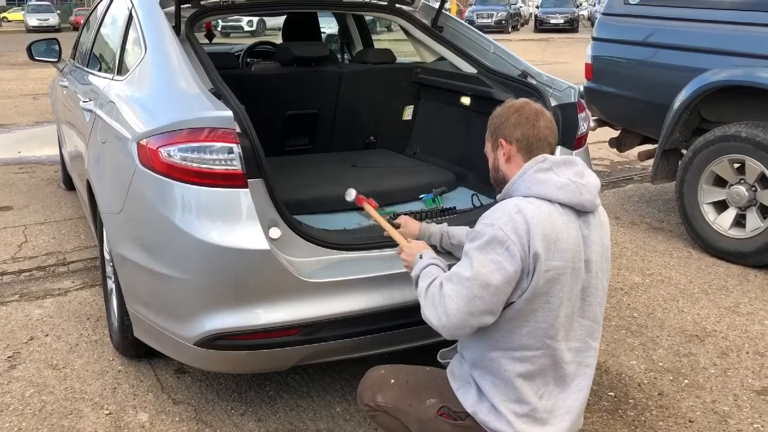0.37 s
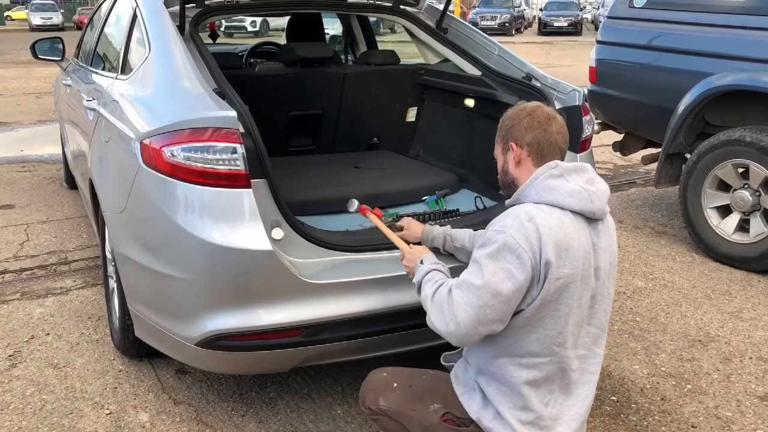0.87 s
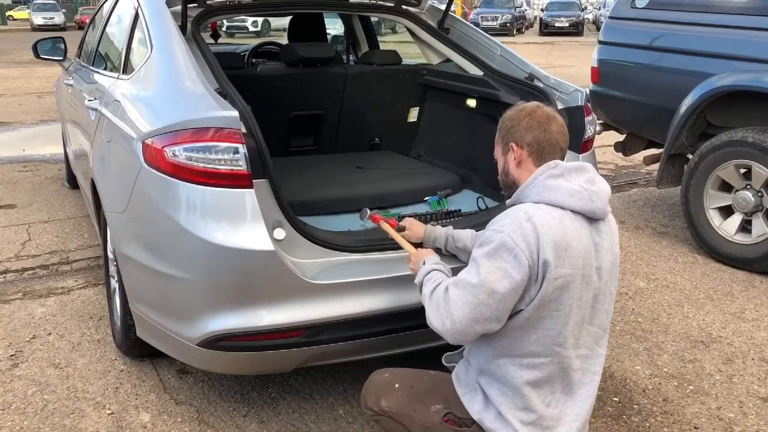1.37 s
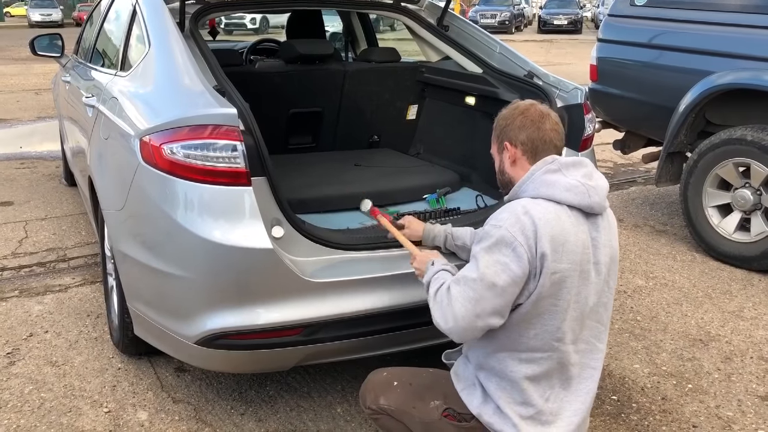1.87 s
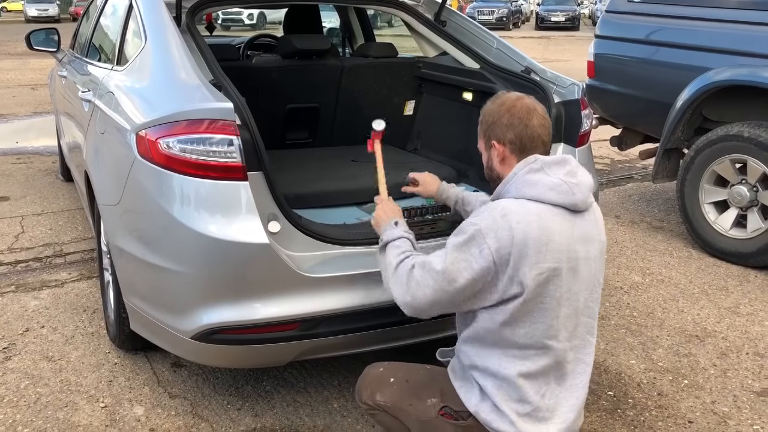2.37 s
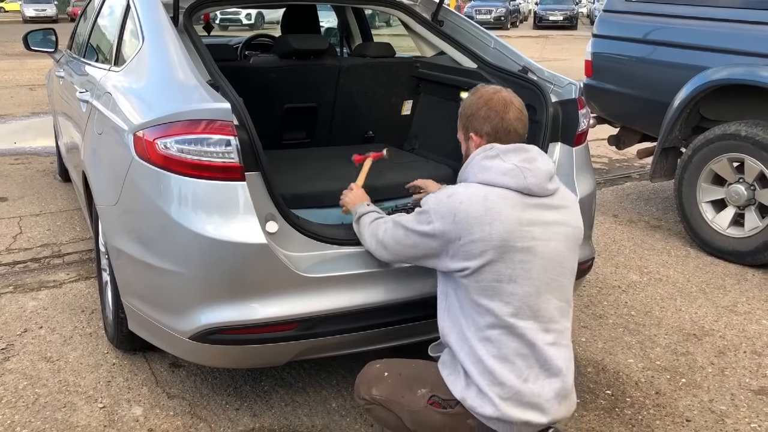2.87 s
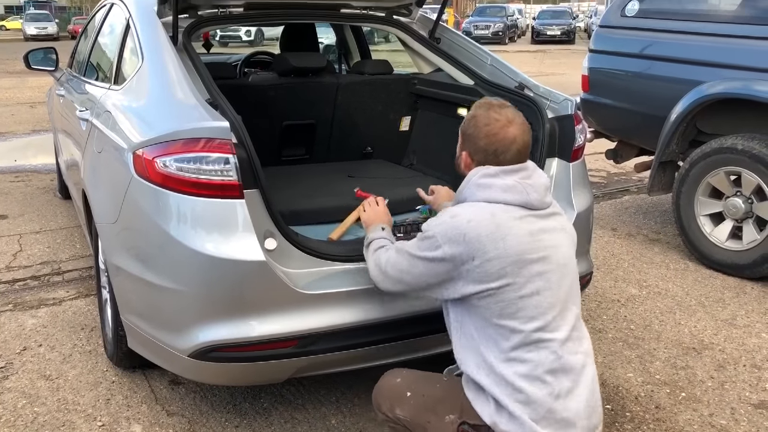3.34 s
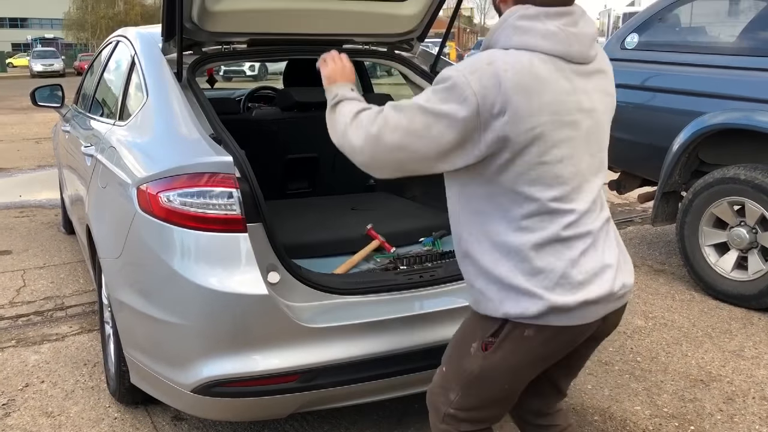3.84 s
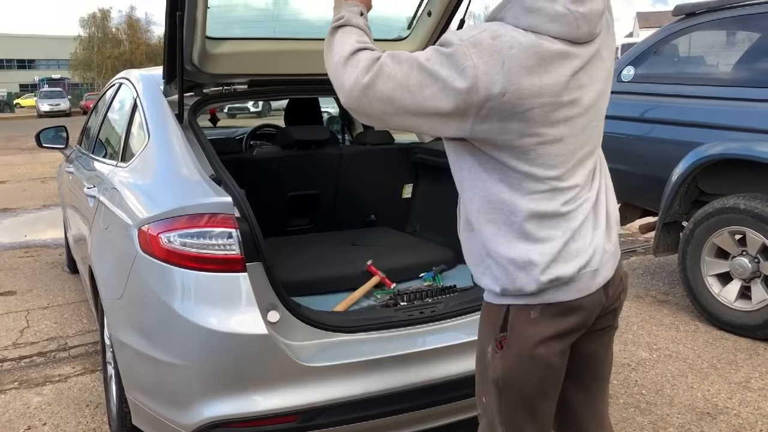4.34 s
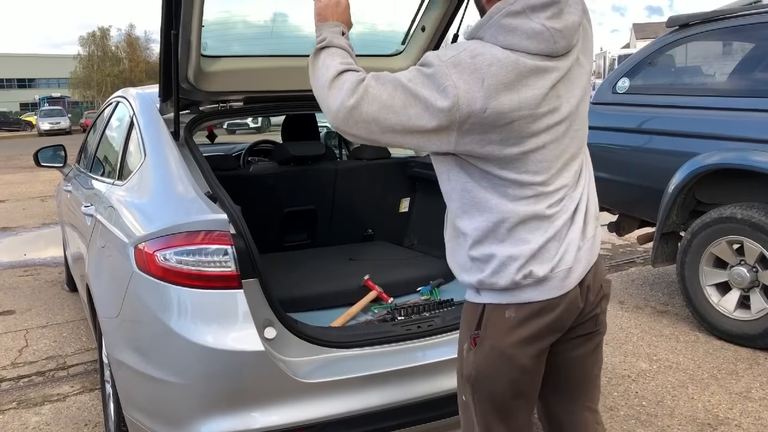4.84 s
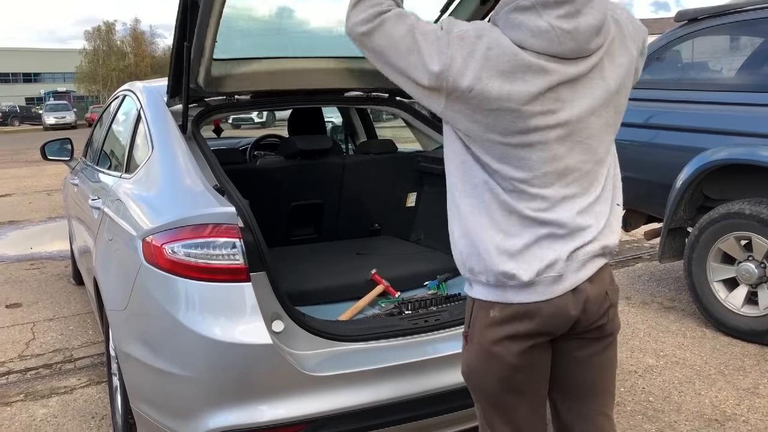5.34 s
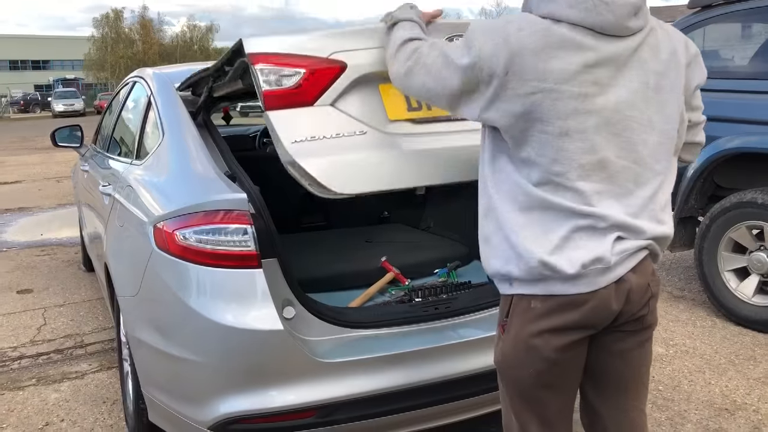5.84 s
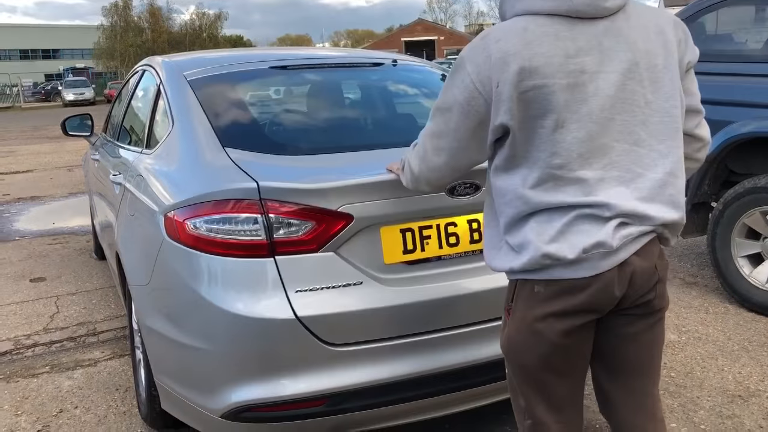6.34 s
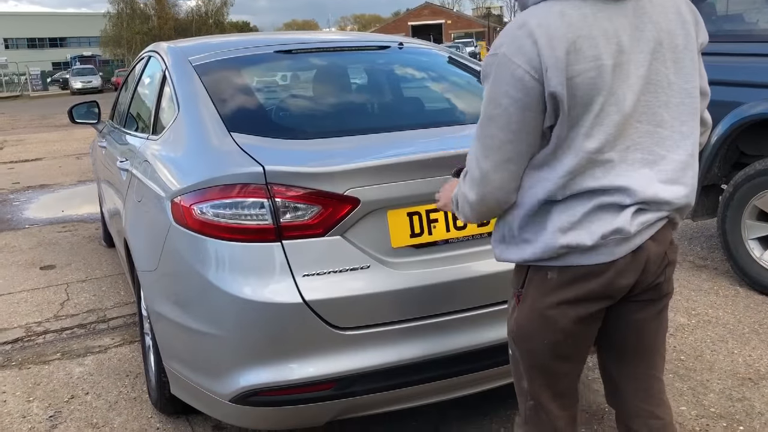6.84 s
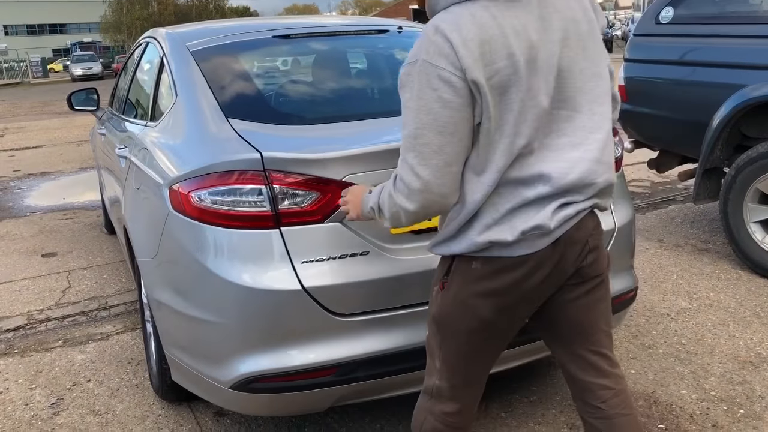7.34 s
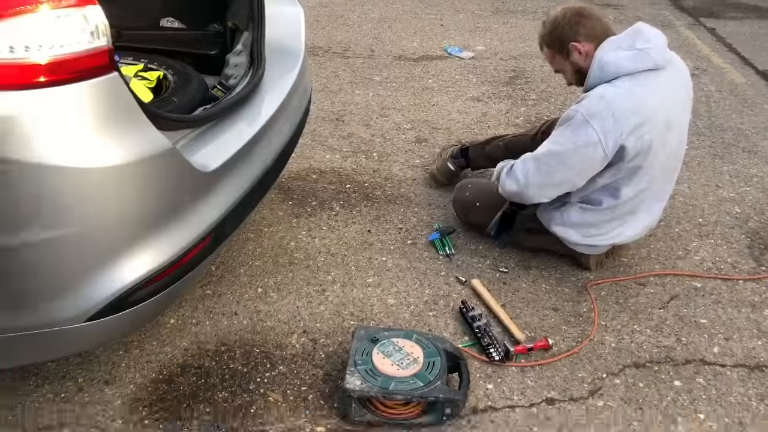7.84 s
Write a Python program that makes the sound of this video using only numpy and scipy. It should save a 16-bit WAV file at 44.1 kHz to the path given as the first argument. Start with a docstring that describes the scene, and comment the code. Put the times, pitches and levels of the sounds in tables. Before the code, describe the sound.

A hammer cracks hard on ringing car steel twice with light taps between, tools clatter down, then a boot lid slams over a distant idling diesel.

```python
"""A hammer hits steel in the open boot of a car: two hard blows, two light taps; tools are put down, then the lid slams.
Each blow is a noise crack, fading sines for the ringing steel and the late boom of the shell, and a panel tail of noise.
Tools are short rings and puffs of noise; the slam is noise knocks over a booming set of fading sines.
Faint hums and squeaks are wavering sines. A four-cylinder diesel idles some way off: pulses set off fading sines.
Under it all, shaped noise makes the steady sound of a yard."""
import sys
import numpy as np
from scipy import signal
from scipy.fft import rfft, irfft
from scipy.io import wavfile

SR = 44100
rng = np.random.default_rng(int(sys.argv[2]) if len(sys.argv) > 2 else 0)


def undo_db(level):
    """Turn decibels back into plain size, where 20 dB means ten times bigger."""
    steps = np.asarray(level, float) / 20
    return 10 ** steps


def dump(signal):
    """Clip the signal to [-1, 1] and save it as 16-bit WAV at the path in sys.argv[1]."""
    limited = np.clip(np.atleast_2d(signal).T, -1, 1)
    pcm = np.round(limited * 32767).astype(np.int16)
    wavfile.write(sys.argv[1], SR, pcm)


N = 350595
TIME = np.arange(N) / SR  # seconds


def on_log(table, hz):
    """Read a (Hz, value) table along log frequency."""
    table_hz, values = np.array(table).T
    return np.interp(np.log(hz + 1), np.log(table_hz), values)


def coloured(size, gain):
    """Noise of rms 1, its spectrum shaped by the amplitude gain(Hz)."""
    hz = np.arange(size // 2 + 1) * SR / size
    x = irfft(rfft(rng.standard_normal(size)) * gain(hz), size)
    return x / np.std(x)


def swell(t, rise, t60):
    """Level curve: builds up with time constant rise, while dying 60 dB every t60 (both in seconds)."""
    build_up = 1 - np.exp(-t / max(rise, 1 / SR))
    return build_up * undo_db(-60 * t / t60)


def add(out, s, x):
    """Mix x into out from time s (seconds)."""
    i = int(s * SR)
    out[i:i + len(x)] += x[:N - i]


def ring(modes, t, cycles, rough, beat_hz):
    """Fading sines that build over some cycles; crowded neighbours make each one beat unevenly."""
    out = 0
    for hz, db, t60 in modes:
        re, im = (coloured(len(t), lambda f: 1 / (1 + (f / beat_hz) ** 2)) for _ in range(2))
        beats = (1 + rough * (re + 1j * im)) / np.sqrt(1 + 2 * rough ** 2)
        turning = np.exp(2j * np.pi * (hz * t + rng.random()))  # random starting phase
        out = out + undo_db(db) * swell(t, cycles / hz, t60) * np.imag(beats * turning)
    return out


def walk(rate):
    """Slow random level, spread 1, moving mostly below rate (Hz)."""
    return coloured(N, lambda hz: 1 / (1 + (hz / rate) ** 2))


def burst(t, centre_hz, octaves, rise, t60):
    """A short puff of contact noise around centre_hz, with peak 1."""
    band = lambda hz: np.exp(-(np.log2((hz + 1) / centre_hz) / octaves) ** 2)
    x = swell(t, rise, t60) * coloured(len(t), band)
    return x / np.max(abs(x))


def tones(table, waver, flicker_db):
    """Faint sines with unsteady pitch and level that fade in and out."""
    out = np.zeros(N)
    for s0, s1, hz0, hz1, db in table:
        size = int((s1 - s0) * SR)
        drift, flicker = (coloured(size, lambda f: (f > 0) / (1 + (f / 12.0) ** 2)) for _ in range(2))
        hz = np.linspace(hz0, hz1, size) * (1 + waver * drift)
        sine = np.sqrt(2) * np.sin(2 * np.pi * np.cumsum(hz) / SR)  # rms 1
        fade = signal.windows.tukey(size, .4)
        add(out, s0, undo_db(db + flicker_db * flicker) * fade * sine)
    return out


def yard():
    """Distant traffic and works: octave bands of noise that swell together and flicker alone."""
    # Overall colour of the noise. Each row: frequency in Hz, relative level in dB per Hz.
    spectrum = [(15, -51), (25, -14), (64, -3), (114, -1), (130, -7.5), (242, -1.5), (326, -9.5), (373, -7),
                (405, -10.5), (516, -7), (575, -11.5), (1260, -16), (1840, -23), (10700, -43),
                (16000, -53.5)]
    # Broad bands standing out of it. Each row: centre in Hz, width in Hz, extra level in dB.
    raised_bands = [(2308, 81, 6.5), (4840, 250, 3.5), (5450, 270, 4.5), (10700, 540, 2), (13200, 550, 5)]
    level_db, leaving_db, leaving_s = -43.5, 2.5, 0.7

    def colour(hz):
        raised = sum(db * np.exp(-((hz - c) / w) ** 2) for c, w, db in raised_bands)
        return undo_db(on_log(spectrum, hz) + raised)

    out, common = 0, walk(0.43)
    noise = rfft(coloured(N, colour))
    octave = np.log2(np.arange(len(noise)) * SR / N + 1)
    for c in np.arange(4, 15):
        band = irfft(noise * np.clip(1 - abs(octave - c), 0, 1), N)  # overlaps its neighbours
        out = out + undo_db(1.35 * common + 1.1 * walk(3.9)) * band
    # louder at first, settling as distant traffic draws away
    return undo_db(level_db + leaving_db * np.exp(-TIME / leaving_s)) * out


def diesel():
    """Steady idle: four firings a cycle, the knock of the harder ones showing most in the upper resonances."""
    # What each firing sets ringing. Each row: frequency in Hz, t60 in seconds, level in dB,
    # dB lost for each unit of softness (a minus sign means gained).
    resonances = [(77.7, .081, -47, 1), (192.4, 0.15, -49.5, -0.5), (299.3, .22, -48, .3),
                  (538.4, 0.19, -52, -0.5), (1228.6, .13, -45.5, 10), (2370, .025, -55, 6.5),
                  (5000, .0254, -55, 2)]
    # Softness of each cylinder's firing, a plain number per cylinder: two knock, two are soft.
    softness = (0.02, 0.11, 1.03, 0.52)
    cycle_hz, first_firing_s = 6.2, 0.00498
    count = int(N / SR * 28)  # more than enough firings to fill the scene
    chance = rng.standard_normal((count, 2))
    firing_s = first_firing_s + np.arange(count) / (4 * cycle_hz) + .0004 * chance[:, 0]
    at = (firing_s * SR).astype(int)
    inside = at < N
    out = 0
    for hz, t60, db, soft_db in resonances:
        strength = undo_db(db - soft_db * np.resize(softness, count) + 2.64 * chance[:, 1])
        pulses = np.zeros(N)
        pulses[at[inside]] = strength[inside]
        t = TIME[:int(t60 * SR)]
        knock = swell(t, 0.0025, t60) * np.sin(2 * np.pi * hz * t)
        out = out + signal.fftconvolve(pulses, knock)[:N]
    return out


def panel_tail(t, colour, light):
    """Bending waves spread through the sheet: noise by half octaves; the lower the band, the later it peaks."""
    # How long the sheet sounds after a hard blow. Each row: frequency in Hz, t60 in seconds.
    hard_t60 = [(100, 0.39), (400, 0.25), (1500, 0.14), (5000, 0.21), (14000, .15)]
    shallow_hz_per_db = 5.5  # a lighter blow does not reach the lowest bands
    out = 0
    for c in 90 * 2 ** (np.arange(16) / 2):
        level = colour(c) * np.sqrt(c / 200) / (1 + (shallow_hz_per_db * light / c) ** 2)
        t60 = 1 / (1 / on_log(hard_t60, c) - .1 * light)  # shorter for a lighter blow
        band = coloured(len(t), lambda hz: np.exp(-(np.log2((hz + 1) / c) / 0.55) ** 2))
        out = out + level * swell(t, 4.0 / c + 0.0065, t60) * band
    return out


def hammer():
    """Steel strikes steel: a sharp crack, rings, a panel tail and a boom that arrives late."""
    # Hammer blows. Each row: start in seconds, blow level in dB, head ring in dB relative to the blow,
    # head ping in dB relative to the blow.
    blows = [(.373, -9.5, -9.5, -19), (1.289, -30, -24, -9), (1.4672, -38, -19.5, -8),
             (1.9508, -9.5, -5.5, -3)]
    # Colour of crack and panel tail for a hard blow. Each row: frequency in Hz, level in dB per Hz.
    panel_colour = [(47, -28), (80, -7.5), (283, -0.5), (404, -17.5), (802, -6), (1900, -18.5), (4420, -18),
                    (6030, -36), (7870, -25.5), (10300, -38), (11700, -33.5), (12500, -52), (16000, -52)]
    # Rings of latch plate, hammer head, the head's thinnest ping, and the car's shell.
    # Each row: frequency in Hz, relative level in dB, t60 in seconds (for all but the head: of a hard blow).
    plate_modes = [(508, -7, .35), (570, -4, .25), (808, -8, .18), (1060, -12, .2), (1325, -6, .22),
                   (1640, -13, .2), (1880, -7, .22), (2070, -10, .2), (2280, -7, .17), (2510, -12, .13),
                   (3180, -13, .2), (3390, -6, .08), (3350, -15, .55), (3560, -20, .45), (3728, -3, .15),
                   (3975, -3, .18), (4090, -18, .3), (4200, -8, .12), (4312, -7, .22), (4506, -7, .18),
                   (4540, -16, .4), (4732, -11, .14), (5260, -18, .18)]
    head_modes = [(6430, -11, .1), (7730, 7, .05), (7757, -15, .4), (7908, -18, .22), (8425, -16, .3),
                  (8560, -10, .12), (8640, -19, .42), (8800, -10, .16), (9135, -16, .12), (15400, -26, .18)]
    ping_modes = [(3430, -23, .5), (3488, -21, .6), (3550, -23, .5), (11590, 0, .12), (11770, -18, .2)]
    shell_modes = [(58.7, -12, 1), (118.2, -9, 0.74), (129.7, 4.5, 0.28), (176.3, -0.5, 0.43),
                   (241.8, -4.5, 0.52), (269.2, -0.5, 0.35), (335, -0.5, 0.24), (391, -20, 0.33)]
    hard_db = -9
    # a lighter blow is duller (dB per octave), and the resting head damps the steel (1 / s)
    dull_per_db, damp_per_db = .12, .22
    # a lighter blow leaves more to the plate and the panel; the boom grows slightly too
    plate_db, plate_per_db = -9, 0.46
    panel_db, panel_per_db = -7, 0.2717
    boom_db, boom_per_db = -0.5, -0.1
    rebound_s, rebound_db, rebound_ring_db = .0065, -8, -18

    out, t = np.zeros(N), TIME[:SR // 2]
    # a loosely held tap lands twice, the head hardly ringing the second time
    rebounds = [(s + rebound_s, db + rebound_db, head + rebound_ring_db, ping + rebound_ring_db)
                for s, db, head, ping in blows if db < 2 * hard_db]
    for s, db, head_db, ping_db in blows + rebounds:
        light = min(db - hard_db, 0)  # 0 or below: dB short of a hard blow

        def colour(hz):
            return undo_db(on_log(panel_colour, hz) + dull_per_db * light * np.log2((hz + 100) / 2000))

        def damped(modes):
            return [(hz, d, 1 / (1 / t60 - damp_per_db * light)) for hz, d, t60 in modes]

        crack_noise = coloured(len(t), lambda hz: colour(hz) * (hz / (hz + 1500.0)) ** 3)
        crack = undo_db(7.5) * swell(t, 0.00024, 0.012) * crack_noise
        plate = ring(damped(plate_modes), t, cycles=0.58, rough=0.85, beat_hz=60.)
        head = ring(head_modes, t, cycles=1.4, rough=0.75, beat_hz=70.)
        ping = ring(damped(ping_modes), t, cycles=18.0, rough=0.4, beat_hz=40.3)
        steel = undo_db(plate_db - plate_per_db * light) * plate + undo_db(head_db) * head + undo_db(ping_db) * ping
        # the shell takes a few hundredths of a second to pick up the blow
        shell = swell(t, .009, .7) * ring(damped(shell_modes), t, cycles=1.6, rough=.3, beat_hz=12.)
        boom = undo_db(boom_db + boom_per_db * light) * shell
        panel = undo_db(panel_db - panel_per_db * light) * panel_tail(t, colour, light)
        add(out, s, undo_db(db) * (crack + steel + boom + panel))
    return out


def echo(near):
    """The open boot and the cars beside it send back a dull, diffuse tail, made of fading noise."""
    level_db, rise_s, t60_s, top_hz = -23, 0.0039, 0.48, 5000.
    dull = lambda hz: hz / (hz + 33.0) / (1 + (hz / top_hz) ** 2)
    tail = swell(TIME[:SR], rise_s, t60_s) * coloured(SR, dull)
    tail = tail / np.sqrt(np.sum(tail ** 2))
    return undo_db(level_db) * signal.fftconvolve(near, tail)[:N]


def handling():
    """Tools touch and are put down: clinks of small steel and short bursts of contact noise."""
    # Tools touching. Each row: start in seconds, level in dB.
    clinks = [(2.862, -33), (3.655, -49.5)]
    # What each clink rings with, one list per clink. Each row: frequency in Hz, relative level in dB,
    # t60 in seconds.
    clink_modes = ([(3530, -7.5, 0.045), (3800, -14, .04), (8190, -8, 0.11), (8310, -6.5, .2),
                   (15600, -23.5, .14)], [(3460, -2, .15), (3740, -2, .15), (4600, -2, .2),
                   (6417, -4, 0.17), (7897, -7, 0.15), (10140, -8, 0.26), (11200, -5, 0.17)])
    # Hard ticks. Each row: start in seconds, peak in dB, centre in Hz.
    ticks = [(1.673, -41, 2980), (2.281, -38, 2490), (2.862, -38, 4800), (3.291, -47, 4500),
             (3.304, -41, 2800), (3.329, -36.5, 4470), (3.345, -40, 4000), (3.356, -33, 3140),
             (3.367, -40, 3000), (3.573, -48, 7000), (3.738, -44, 5000), (3.793, -48, 4000),
             (4.258, -45, 4500), (4.58, -36, 2300)]
    # Soft thumps. Each row: start in seconds, peak in dB, centre in Hz.
    thumps = [(3.131, -31, 199), (3.165, -22, 220), (3.641, -29, 280), (4.266, -30, 170),
              (5.915, -31.5, 204)]
    # Scuffs and rustles, cut after 1 s. Each row: start in seconds, peak in dB, centre in Hz, t60 in seconds.
    scuffs = [(2.79, -43, 11800, 0.061), (3.334, -48, 7000, 0.24), (4.93, -53.5, 8680, 3.2),
              (5.88, -55, 10000, .07), (5.903, -54, 9000, .1), (7.32, -53.5, 7000, .072)]
    out, t = np.zeros(N), TIME[:SR]
    for (s, db), modes in zip(clinks, clink_modes):
        add(out, s, undo_db(db) * ring(modes, t, cycles=0.97, rough=0.62, beat_hz=40.))
    for s, db, hz in ticks:
        add(out, s, undo_db(db) * burst(t, hz, octaves=.85, rise=0.000504, t60=.026))
    for s, db, hz in thumps:
        add(out, s, undo_db(db) * burst(t, hz, octaves=0.79, rise=0.0034, t60=0.061))
    for s, db, hz, t60 in scuffs:
        add(out, s, undo_db(db) * burst(t, hz, octaves=0.96, rise=0.1 * t60, t60=t60))
    return out


def hums():
    """A low hum that comes and goes: single sines gliding in pitch."""
    # Each row: start in seconds, end in seconds, start pitch in Hz, end pitch in Hz, middle level in dB.
    hum_table = [(2.12, 2.68, 232.7, 237.4, -46), (4.33, 4.63, 240, 210.7, -45.5),
                 (5.03, 5.27, 218.6, 227, -49), (5.4, 5.6, 202, 223.5, -49.5)]
    return tones(hum_table, waver=0.0044, flicker_db=2.0)


def squeaks():
    """Thin squeaks, most of them while the lid comes down: high, slightly wavering sines."""
    # Each row: start in seconds, end in seconds, start pitch in Hz, end pitch in Hz, middle level in dB.
    squeak_table = [(5.03, 5.37, 7940, 7940, -67), (5.07, 5.26, 6950, 7000, -75),
                    (5.36, 5.53, 7200, 6900, -70), (5.47, 5.54, 8550, 8500, -71),
                    (5.59, 5.73, 7000, 6950, -73), (5.42, 5.72, 2760, 2780, -62),
                    (7.86, 7.96, 7750, 7750, -75)]
    return tones(squeak_table, waver=0.0023, flicker_db=3.5)


def lid():
    """The seal is crushed, latch and stops are struck, the trim rattles; the closed boot booms."""
    # Lid striking latch and stops. Each row: start in seconds, level in dB, brightness in dB per octave.
    strikes = [(6.282, -12.5, 2), (6.292, -13, 0), (6.318, -11, 1.2), (6.381, -19, -1.5)]
    # Colour of the shaken lid. Each row: frequency in Hz, relative level in dB per Hz.
    lid_colour = [(38, -38), (60, 1.5), (207, -15), (238, 2.5), (268, 3.5), (301, -3), (448, -9.5),
                  (651, -4.5), (1060, -17), (1910, -17), (5460, -28), (11300, -39), (15800, -50.5),
                  (16300, -84)]
    # Boom of the closed boot. Each row: frequency in Hz, level in dB, t60 in seconds.
    boom_modes = [(42.4, -13, .35), (61.2, -9, 0.41), (110.2, -5.5, 0.27), (148.8, -19.5, 0.51),
                  (190, -16, 0.44), (240, -21.5, 0.49), (314, -21.5, 0.32), (557, -18.5, 0.21),
                  (644, -24, 0.19), (827, -24.5, 0.2), (932, -16, 0.097), (1380, -29, 0.17),
                  (1880, -31, 0.13), (3530, -12.5, .035)]
    seal_s, seal_db, seal_rise_s, seal_t60_s, seal_tilt_db = 6.275, -3, .017, .13, 3
    rattle_s, rattle_gap_s, rattle_db, rattle_fade_db, rattle_tilt_db = 6.338, .015, -17, -3, -1.2
    out, t = np.zeros(N), TIME[:SR // 2]

    def shake(tilt):
        return coloured(len(t), lambda hz: undo_db(on_log(lid_colour, hz) + tilt * np.log2((hz + 50) / 1000)))

    add(out, seal_s, undo_db(seal_db) * swell(t, seal_rise_s, seal_t60_s) * shake(seal_tilt_db))
    # the trim rattles as the lid settles: five uneven knocks, weaker on the whole
    rattle = []
    for k, (a, b) in enumerate(rng.standard_normal(size=(5, 2))):
        knock_s = rattle_s + rattle_gap_s * (k + .25 * a)
        knock_db = rattle_db + rattle_fade_db * k + 1.7 * b
        rattle.append((knock_s, knock_db, rattle_tilt_db))
    for s, db, tilt in strikes + rattle:
        add(out, s, undo_db(db) * swell(t, rise=0.0017, t60=0.078) * shake(tilt))
    add(out, 6.282, ring(boom_modes, t, cycles=1.0, rough=0.65, beat_hz=22.0))
    return out


def scene():
    """All sources at one microphone."""
    inside = hammer() + handling()
    background = yard() + diesel()
    return (inside + echo(inside) + hums() + squeaks() + lid() + background)[None]


def roll_off(x):
    """The treble ends steeply here."""
    return signal.sosfilt(signal.butter(12, 16830, fs=SR, output="sos"), x)


def record(dry):
    """The phone loses the deepest bass and rounds the loudest peaks."""
    low_cut = signal.butter(2, 42., "high", fs=SR, output="sos")  # Hz
    thin = signal.sosfilt(low_cut, dry)
    mix = np.tanh(1.105 * thin) / 1.09
    return roll_off(mix)


dry = scene()
out = record(dry)
dump(out)
```